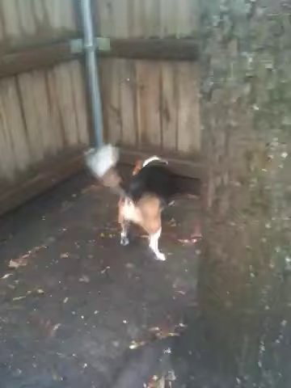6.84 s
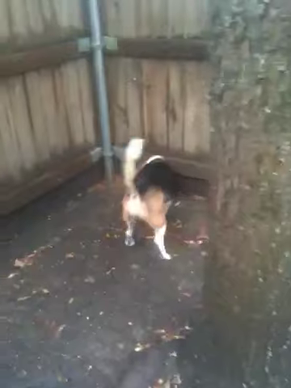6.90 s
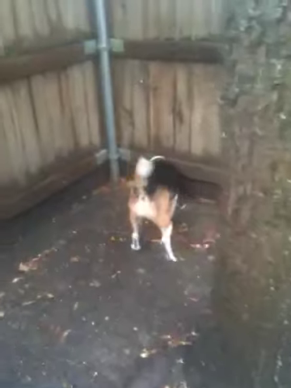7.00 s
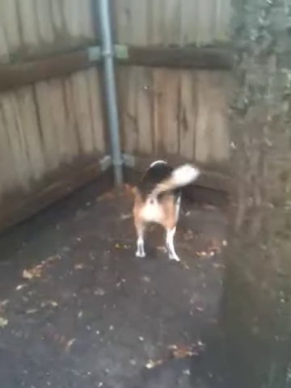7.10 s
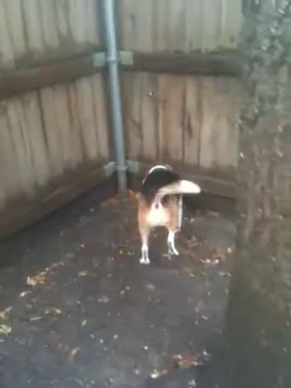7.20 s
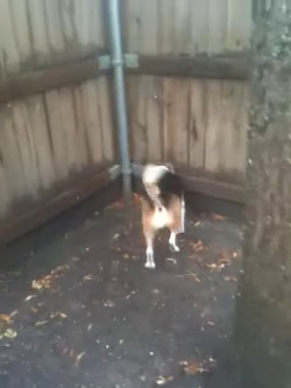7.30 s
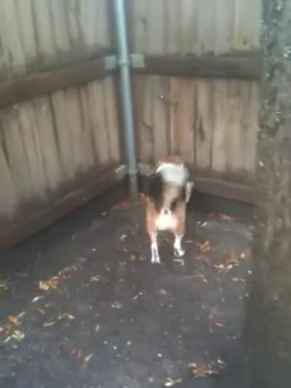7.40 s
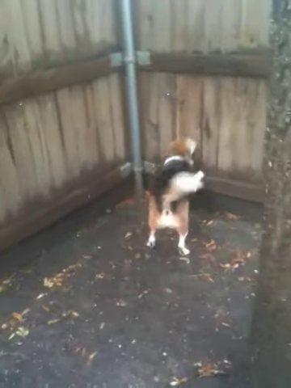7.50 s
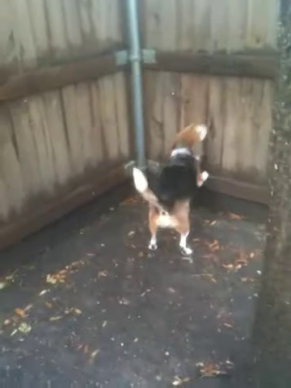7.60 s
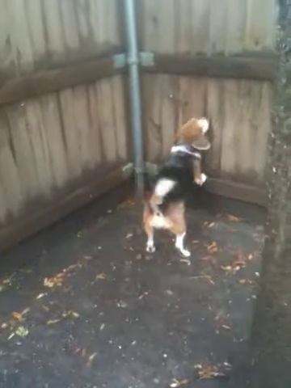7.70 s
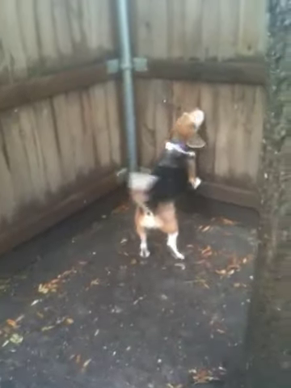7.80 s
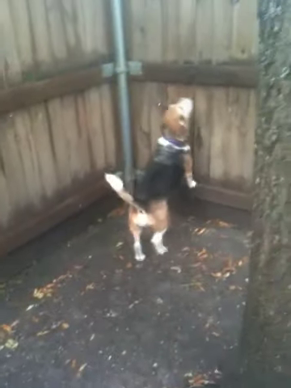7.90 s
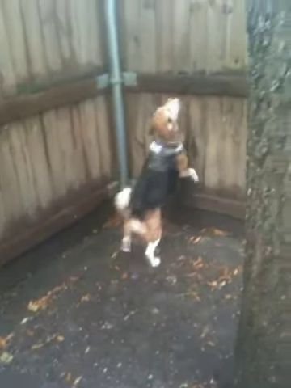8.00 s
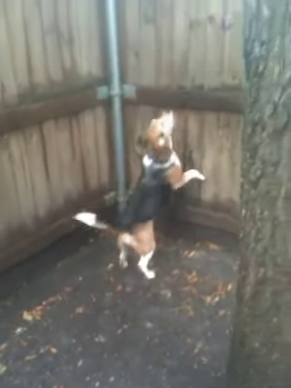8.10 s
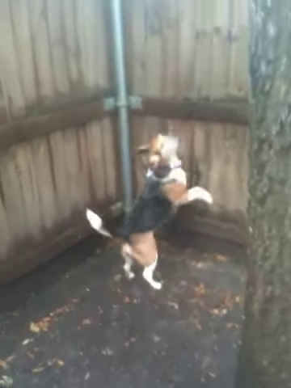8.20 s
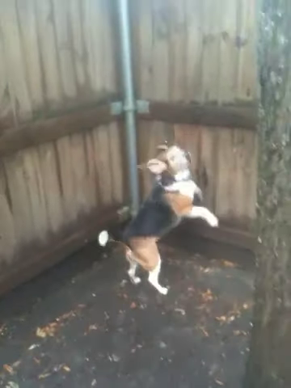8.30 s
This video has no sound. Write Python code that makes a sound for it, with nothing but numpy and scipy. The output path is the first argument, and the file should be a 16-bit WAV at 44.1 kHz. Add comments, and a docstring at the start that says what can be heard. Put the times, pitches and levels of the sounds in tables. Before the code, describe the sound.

In a quiet backyard, a far-off dog howls faintly over a low motor hum and a bird chirps. Close by, a beagle lets out a long hoarse bay, pauses, then gives a longer wavering one. Two short barks follow, the second weaker. Soft snuffs and small paw ticks fall between the calls, and collar tags clink faintly near the end. The yard adds a little echo.

```python
"""First a far-off dog howls over a humming motor; a bird chirps twice as the scene goes on.
Close by, in the corner of a wooden yard fence, a beagle gives two long hoarse bays and two short barks.
Its vocal folds buzz to make the tone, shake unevenly for the rasp, and slacken into a low creak at the
end of each call. Between calls it snuffs air through its muzzle, its paws tick on the leafy ground
and its collar tags clink."""
import sys
import numpy as np
from scipy import signal
from scipy.fft import rfft, irfft, next_fast_len
from scipy.io import wavfile
from scipy.ndimage import uniform_filter1d, minimum_filter1d, map_coordinates

SR = 44100
rng = np.random.default_rng(int(sys.argv[2]) if len(sys.argv) > 2 else 0)


def generate_wav(sig):
    """Save sig (samples, or channels by samples) to the path in sys.argv[1] as 16-bit PCM at SR."""
    pcm = np.round(np.clip(np.atleast_2d(sig).T, -1, 1) * 32767).astype(np.int16)
    wavfile.write(sys.argv[1], SR, pcm)


N = 368235
TIME = np.arange(N) / SR

# Levels in the tables are relative: the functions set the final loudness.
# tone colour of the outdoor air: (frequency [Hz], level [dB])
AIR_COLOUR = [(24, -73), (40, -43), (64, -25), (87, -12), (124, -7.5), (199, -0.5), (249, -6.5),
              (269, -11.5), (455, -11.5), (733, -18), (896, -19), (3060, -30), (3300, -29), (8550, -31.5),
              (16000, -34)]
# swells of the distant motor: (peak time [s], length [s], level [dB])
MOTOR_SWELLS = [(0, .5, -55.5), (0.653, 0.81, -51), (2.611, 1.32, -61), (5.51, 2.4, -73), (8.35, 0.82, -73)]
# gliding notes: (start [s], end [s], first pitch [Hz], last pitch [Hz], level [dB])
HOWL_NOTES = [(-.06, 0.19, 1099, 1181, -49), (.2, 0.34, 974, 962, -43.5), (.3, .52, 799, 782, -44.5),
              (.48, .8, 774.6, 734, -57)]  # the far dog, falling in steps
BIRD_NOTES = [(.822, .885, 4677, 4990, -48.5), (.86, .95, 4960, 4860, -51), (3.415, 3.465, 4670, 4550, -49)]
GRUNT_NOTES = [(4.93, 5.02, 262, 155.6, -42.5), (5.26, 5.36, 233.8, 154, -51),
               (6.29, 6.36, 331.7, 184, -42)]  # the beagle, soft and low after its calls
# how long echoes last: (frequency [Hz], time to fade by 60 dB [s])
YARD_FADE = [(200, 0.56), (700, 0.46), (2000, 0.41), (3200, 0.48), (6000, 0.38), (12000, 0.23)]
FAR_WALL_FADE = [(200, .8), (650, 0.96), (1000, .6), (4000, .4), (12000, .2)]
# bounces off the ground and the two fence walls: (delay [s], gain [ratio])
BOUNCES = [(.0019, 0.15), (.0046, 0.35), (.0087, .35)]
# collar tags knocking together: (time [s], level [dB])
CLINKS = [(6.6035, -44.5), (6.8074, -47), (6.8344, -51), (6.9247, -39.5), (6.977, -46), (8.092, -47.5)]
# a tag's ringing tones: (frequency [Hz], level [dB], time to fade by 60 dB [s])
TAG_TONES = [(5792, -2, 0.075), (8473, 3.5, 0.094), (9625, -9, 0.17), (11590, -8, 0.12),
             (15370, -15, 0.047)]
# paws, twigs and lips: (time [s], level [dB], extra level of the dull body [dB], time to fade 60 dB [s])
TICKS = [(0.153, -54, 13, 0.011), (0.958, -51.5, -9, 0.019), (1.132, -49, -29, 0.072),
         (1.468, -52, -2, 0.11), (3.973, -43, -3, .04), (3.985, -34, -19, 0.019),
         (7.312, -52.5, -17, 0.016), (7.617, -48.5, -4, 0.051), (7.665, -48.5, -9, 0.039),
         (7.684, -50.5, -4, .05), (7.979, -43, 4.5, .09)]
# puffs through nose and mouth; the last is the breathy start of another bark, cut short:
# (peak time [s], length [s], body level [dB], high rush level [dB])
SNUFFS = [(0.351, 0.083, -54, -73), (0.895, 0.15, -65.5, -65), (2.135, 0.082, -44, -56.5),
          (2.452, 0.096, -57.5, -75.5), (3.455, .07, -60.5, -69.5), (3.969, 0.16, -59, -71),
          (4.941, .05, -42.5, -64.5), (5.295, 0.088, -54.5, -69.5), (5.954, .09, -42.5, -65),
          (6.04, .1, -45.5, -57.5), (6.115, 0.05, -55, -46.5), (6.171, 0.019, -42, -40),
          (6.326, 0.17, -38.5, -47.5), (6.703, 0.06, -48, -59), (7.792, 0.034, -60.5, -86.5),
          (8.191, 0.067, -50.5, -62), (8.35, 0.021, -42.5, -63)]
# tone colours of snuffs and small knocks: (frequency [Hz], level [dB])
BODY_COLOUR = [(200, -21.5), (450, -10.5), (700, -4.5), (920, -0.5), (1250, -7.5), (1480, -12),
               (1900, -11.5), (2300, -13), (2650, -11), (3200, -10), (4200, -21), (6500, -38),
               (12000, -51.5)]  # the open muzzle
RUSH_COLOUR = [(2200, -7), (3500, -0.5), (5000, -2), (6500, -1.5), (8500, -4), (12000, -10), (16000, -19.5)]  # a bright rush of air
# tone colours of the voice: (frequency [Hz], level [dB])
MOUTH_COLOUR = [(350, -19.5), (460, -16.5), (520, -28), (590, -5.8), (680, -3.5), (800, 2), (925, 1),
                (1020, -7), (1170, -4), (1330, -6), (1650, -20), (1840, -25.5), (1900, -15), (2010, -18),
                (2100, -31)]  # shapes the three lowest harmonics (multiples of the pitch)
THROAT_COLOUR = [(1500, -1.5), (1900, 5), (2400, 0.5), (2900, -4), (3300, -15.5), (3900, -26.5),
                 (4600, -27.5), (5300, -26.5), (6400, -36.5), (8000, -26.5), (9600, -28), (10500, -37),
                 (12500, -33), (15500, -51)]  # shapes the overtones above them
RASP_COLOUR = [(150, -44.5), (330, -32), (520, -30.5), (650, -4), (850, 6.5), (1050, -7), (1300, -16.5),
               (1480, -19), (2050, -11), (2300, -15.5), (2600, -20.5), (3000, -31.5), (3400, -28),
               (4200, -39.5), (5800, -49), (8000, -39), (15500, -55.5)]  # hoarse breath
HISS_COLOUR = [(2800, -9), (3400, 0.5), (4200, -2.5), (5100, -5.5), (6200, -8.5), (7800, -2), (9700, -3),
               (10500, -12), (12000, -10), (15500, -25)]  # air between the teeth
# the course of each call: (time [s], pitch [Hz], effort [dB], rasp [dB])
FIRST_BAY = [(1.563, 484, -21.5, -35), (1.59, 500, -7, -33), (1.63, 533, -5.5, -36),
             (1.665, 606.4, -3.5, -23), (1.69, 616.5, -9, -9.5), (1.765, 674, -5.5, -19),
             (1.86, 676.5, -7, -29.5), (1.96, 686.5, -7, -22.5), (2.04, 666.4, -8, -27.5),
             (2.075, 620, -12.5, -28.5), (2.1, 448.5, -18, -24.5), (2.138, 387.3, -22, -37)]
SECOND_BAY = [(4.06, 517.6, -16, -30.5), (4.1, 628.7, -6.5, -23.5), (4.125, 648.2, -8, -13.5),
              (4.22, 654, -10, -19), (4.29, 673.9, -11, -26.5), (4.345, 687.3, -5, -26),
              (4.395, 652, -11.5, -21), (4.44, 633.7, -8, -39), (4.54, 626.3, -12, -41.5),
              (4.575, 530.8, -17.5, -40), (4.68, 457.5, -11, -45), (4.72, 517, -13.5, -33),
              (4.76, 583, -8, -39), (4.81, 599.3, -7.5, -40.5), (4.865, 572.4, -10, -36.5),
              (4.903, 456.8, -12.5, -21), (4.958, 320.2, -28.5, -30.5)]
FIRST_BARK = [(5.75, 511, -12.5, -34.5), (5.79, 534.9, -10, -39), (5.84, 551.3, -17.5, -25.5),
              (5.887, 535.5, -25, -36.5)]
SECOND_BARK = [(6.162, 443.2, -44.5, -55.5), (6.195, 458, -28, -31), (6.235, 472.5, -13.5, -36),
               (6.265, 455.9, -16.5, -34), (6.29, 443.4, -25, -34), (6.335, 423.8, -30.5, -31)]
# how the mouth is held in each call:
# (course [table], jaw resonance [Hz], lip resonance [Hz], nose notch [Hz], upper overtones [dB])
CALLS = [(FIRST_BAY, 2480, 6600, 1300, -19.5), (SECOND_BAY, 2400, 11500, 1400, -16.5),
         (FIRST_BARK, 2130, 4700, 1680, -18.5), (SECOND_BARK, 2880, 5600, 2600, -10.5)]
# the creak that ends each call: (start [s], end [s], flap rate [Hz], depth [0-1])
CREAKS = [(2.098, 2.145, 85, 0.6), (4.892, 4.953, 93.3, 0.6), (5.841, 5.901, 98, 0.6),
          (6.274, 6.305, 59, 0.99)]


def amp(db):
    """Turn decibels into a gain."""
    return 10 ** (np.asarray(db) / 20)


def along(points, hz):
    """Read between (frequency, value) points on a log frequency axis."""
    freqs, values = np.transpose(points)
    return np.interp(np.log(hz + 1), np.log(freqs + 1), values)


def wobble(rate):
    """A smooth curve through `rate` random points a second."""
    points = rng.standard_normal(int(N * rate / SR) + 4)
    return map_coordinates(points, [TIME * rate])


def filtered(x, response):
    """Scale each frequency in x by response(frequency)."""
    size = next_fast_len(N + SR // 2)
    return irfft(rfft(x, size) * response(np.fft.rfftfreq(size, 1 / SR)), size)[:N]


def noise(colour, gate=1):
    """Noise shaped in time by gate, then coloured and scaled to an average power of 1."""
    x = filtered(gate * rng.standard_normal(N), lambda hz: amp(along(colour, hz)))
    return x / np.sqrt(np.mean(x ** 2) + 1e-20)


def window(start, end, edge):
    """1 between start and end, with ramps outside."""
    return np.clip(1 + np.minimum(TIME - start, end - TIME) / edge, 0, 1)


def swell(time, length):
    """A smooth bump of height 1 centred on time."""
    return np.exp(-(2 * (TIME - time) / length) ** 2)


def decay(time, fade_s):
    """A sudden start that fades by 60 dB in fade_s."""
    return (TIME >= time) * amp(-60 * np.clip((TIME - time) / fade_s, 0, 2))


def step(x, width):
    """Rises smoothly from 0 to 1 as x passes zero."""
    return (1 + np.tanh(x / (2 * width))) / 2


def phase_of(hz):
    """The running angle of a wave whose frequency moves."""
    return 2 * np.pi * np.cumsum(hz) / SR


def background(hum_hz=201, low_hum_db=-77, drone_hz=241, drone_db=-69, air_db=-62):
    """Still outdoor air, a motor's hum that swells and fades, and a faint wavering drone."""
    phase = phase_of(hum_hz * (1 + 0.0024 * wobble(2.7)))
    swells = sum(amp(db) * swell(time, length) for time, length, db in MOTOR_SWELLS)
    hum = swells * np.sin(phase) + amp(low_hum_db) * np.sin(phase / 2)
    drone_gain = amp(drone_db + 3.5 * wobble(12))
    drone = drone_gain * np.sin(phase_of(drone_hz * (1 + .016 * wobble(13))))
    return np.sqrt(2) * (hum + drone) + amp(air_db) * noise(AIR_COLOUR)


def wall_echo(x, fade_times, delay_s):
    """Walls send back a blurred tail of sound whose treble dies first."""
    hz, t, spectrum = signal.stft(rng.standard_normal(SR), SR, nperseg=256)
    fade = amp(-60 * t / along(fade_times, hz)[:, None])
    tail = signal.istft(spectrum * fade, SR, nperseg=256)[1]
    tail = np.pad(tail / np.linalg.norm(tail), (int(delay_s * SR), 0))
    return signal.fftconvolve(x, tail)[:N]


def fence(x):
    """Close bounces boost some frequencies and cancel others, so gliding overtones swell and fade."""
    def response(hz):
        return 1 + sum(gain * np.exp(-2j * np.pi * hz * delay) for delay, gain in BOUNCES)
    power = 1 + sum(gain ** 2 for _, gain in BOUNCES)
    return filtered(x, response) / np.sqrt(power)


def gliding_voice(notes, waver, overtone_db):
    """A howl, chirp or grunt: soft sliding notes that waver in pitch, with two weak overtones."""
    out = np.zeros(N)
    drift = 1 + waver * wobble(45)
    for start, end, first_hz, last_hz, db in notes:
        progress = np.clip((TIME - start) / (end - start), 0, 1)
        phase = phase_of((first_hz + progress * (last_hz - first_hz)) * drift)
        tone = np.sin(phase) + amp(overtone_db) * (np.sin(2 * phase) + np.sin(3 * phase))
        arch = np.sqrt(np.abs(np.sin(np.pi * progress)))
        out += amp(db) * arch * tone
    return out


def collar_tags(ring_db=-10, rattle_db=-14, rattle_s=0.0095):
    """Each clink is a tiny rattle that rings the tag's tones at new strengths."""
    ring, rattle = np.zeros(N), np.zeros(N)
    for time, db in CLINKS:
        rattle += amp(db + rattle_db) * decay(time, rattle_s)
        for hz, tone_db, fade_s in TAG_TONES:
            strength = amp(db + tone_db + rng.normal(0, 3.0))
            ring += strength * decay(time, fade_s) * np.sin(2 * np.pi * hz * TIME)
    return amp(ring_db) * ring + rattle * noise(RUSH_COLOUR)


def ticks(snap_db=-5, body_db=-7, patter_db=-71):
    """Paws, twigs and lips make dry snaps with a duller body; wet leaves patter faintly near the end."""
    snap, body = np.zeros(N), np.zeros(N)
    for time, db, extra_db, fade_s in TICKS:
        hit = amp(db) * decay(time, fade_s)
        snap += amp(snap_db) * hit
        body += amp(body_db + extra_db) * hit
    patter = amp(patter_db + 3 * wobble(120)) * window(7.5, 7.75, edge=0.62)
    return (snap + patter) * noise(RUSH_COLOUR) + body * noise(BODY_COLOUR)


def snuffs(flutter_db=2):
    """Fluttering puffs through nose and mouth; the last is the breathy start of a bark, cut short."""
    body, rush = np.zeros(N), np.zeros(N)
    for time, length, body_db, rush_db in SNUFFS:
        breath = swell(time, length)
        body += amp(body_db) * breath
        rush += amp(rush_db) * breath
    flutter = amp(flutter_db * wobble(120))
    return flutter * (body * noise(BODY_COLOUR) + rush * noise(RUSH_COLOUR))


def creak():
    """Slack vocal folds flap slowly: a gain that chops the voice into puffs."""
    gain = np.ones(N)
    for start, end, rate, depth in CREAKS:
        gain -= depth * window(start, end, edge=0.006) * np.cos(2 * np.pi * rate * (TIME - start))
    return gain


def peak(hz, centre_hz, width_hz):
    """A resonance: a hump of height 1 around one frequency."""
    return 1 / (1 + ((hz - centre_hz) / width_hz) ** 2)


def overtones(pitch, phase, jaw_hz, lip_hz, sounding, jaw_db=12, lip_db=6, ragged_db=8):
    """Harmonics 4 to 30 slide through the resonances of throat, jaw and lips at an even total power."""
    orders = np.arange(4, 31)[:, None]

    def drift(rate):
        position = [TIME[sounding] * rate]
        return np.array([map_coordinates(rng.standard_normal(N // 100), position) for _ in orders])

    hz = orders * pitch[sounding]
    jaw = jaw_db * peak(hz, jaw_hz[sounding], width_hz=190)
    lips = lip_db * peak(hz, lip_hz[sounding], width_hz=1100)
    # each overtone swells, fades and wanders in phase on its own, the high ones most
    height = np.minimum(hz / 4500, 1)
    weights = amp(along(THROAT_COLOUR, hz) + jaw + lips + ragged_db * height * drift(30))
    wander = rng.uniform(0, 2 * np.pi, orders.shape) + 0.98 * height ** 3 * drift(170)
    waves = np.sin(orders * phase[sounding] + wander)
    out = np.zeros(N)
    out[sounding] = np.sum(weights * waves, axis=0) / np.linalg.norm(weights, axis=0)
    return out


def call_controls(course, jaw_hz, lip_hz, notch_hz, bright_db, notch_db=-20, hoot_hz=631, hoot_db=-21.5,
                  bright_s=.105, grit_db=-25, catch_db=-9.5, catch_s=.013,
                  attack_s=0.0076, release_s=0.026, jaw_rise_hz=300, jaw_open_s=0.066):
    """One call's pitch and resonances, and its gains for three low harmonics, overtones and rasp."""
    times, *columns = np.transpose(course)
    pitch, effort_db, rasp_db = [np.interp(TIME, times, column) for column in columns]
    age = np.maximum(TIME - times[0], 0)
    hz = np.outer((1, 2, 3), pitch)
    nose = notch_db * peak(hz, notch_hz, width_hz=202)  # the nose swallows one narrow band
    low = amp(effort_db + along(MOUTH_COLOUR, hz) + nose)
    # every call opens bright; after that, high notes turn to a hoot and lose their overtones
    hoot = step(pitch - hoot_hz, width=6) * step(age - bright_s, width=.018)
    grit = amp(rasp_db + grit_db)  # rasping folds slap shut and add overtones
    upper = np.hypot(amp(effort_db + bright_db + hoot_db * hoot), grit)
    catch = amp(effort_db + catch_db) * np.exp(-age / catch_s)  # the folds catch before they settle
    rasp = amp(rasp_db) + catch
    gate = np.clip(age / attack_s, 0, 1) * np.clip(.5 + (times[-1] - TIME) / release_s, 0, 1)
    jaw = jaw_hz - jaw_rise_hz * np.exp(-age / jaw_open_s)  # climbs as the mouth opens
    return np.array([pitch, jaw, np.full(N, lip_hz)]), gate * np.vstack([low, upper, rasp])


def beagle(jitter=.005, rough_jitter=.03, rasp_db=-1, hiss_db=-34, sputter_db=3.0):
    """Vocal folds buzz, shake unevenly when forced, and let out a puff of noisy air each cycle."""
    tuning, levels = 0, 0
    for course, *mouth in CALLS:
        call_tuning, gains = call_controls(course, *mouth)
        tuning = np.where(TIME >= course[0][0], call_tuning, tuning)
        levels = levels + gains
    note, jaw_hz, lip_hz = tuning
    *low_gains, upper, rasp = levels
    rough = rasp / (np.linalg.norm(levels, axis=0) + 1e-9)  # the hoarse share of the voice
    forced = np.clip(rough / 0.15, 0, 1)  # 0 where the folds swing cleanly
    pitch = note * (1 + jitter * (.8 + forced) * wobble(70) + rough_jitter * rough * wobble(420))
    phase = phase_of(pitch)

    def shake(k):
        """A fluttering gain; in a forced voice, a higher k flutters more deeply."""
        flutter_db = (0.85 + 2.0 * k * forced) * wobble(65)
        return amp(flutter_db + (k - 1) * rough * wobble(330))

    low = sum(gain * shake(k) * np.sin((k + 1) * phase) for k, gain in enumerate(low_gains))
    high = upper * shake(0.4) * overtones(pitch, phase, jaw_hz, lip_hz, sounding=upper > 0)
    airflow = (1 + 0.17 * np.cos(phase)) * amp(sputter_db * wobble(260))  # uneven bursts
    hoarse = amp(rasp_db) * rasp * noise(RASP_COLOUR, airflow)
    hiss = amp(hiss_db) * (upper + rasp) * noise(HISS_COLOUR, airflow)
    flaps = creak()
    return flaps * (np.sqrt(2) * low + hoarse) + fence(flaps * (np.sqrt(2) * high + hiss))


def scene():
    """The beagle is close, with little echo; the distant dog and bird carry more."""
    near = beagle() + gliding_voice(GRUNT_NOTES, waver=.06, overtone_db=-13)
    near += snuffs() + ticks() + collar_tags()
    howl = gliding_voice(HOWL_NOTES, waver=0.0269, overtone_db=-28.5)
    bird = gliding_voice(BIRD_NOTES, waver=0.00543, overtone_db=-33)
    yard_echo = wall_echo(amp(-14) * (near + bird) + amp(-4) * howl, YARD_FADE, delay_s=.018)
    late_echo = amp(-34) * wall_echo(near, FAR_WALL_FADE, delay_s=0.094)
    return (near + amp(-2) * (howl + bird) + yard_echo + late_echo + background())[None]


def record(dry, ceiling=0.69, limiter_s=0.0011, bass_cut_hz=62, top_hz=15850):
    """A fast limiter holds down the peaks; the small microphone drops deep bass and the top treble."""
    span = 2 * int(limiter_s * SR / 2) + 1
    needed_gain = ceiling / np.maximum(np.abs(dry[0]), ceiling)
    limited = dry[0] * uniform_filter1d(minimum_filter1d(needed_gain, span), span)
    return filtered(limited, lambda hz: (hz < top_hz) * hz ** 2 / np.hypot(hz ** 2, bass_cut_hz ** 2))[None]


dry = scene()
out = record(dry)
generate_wav(out)
```